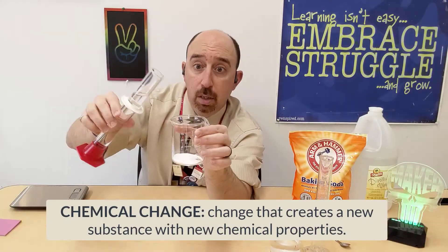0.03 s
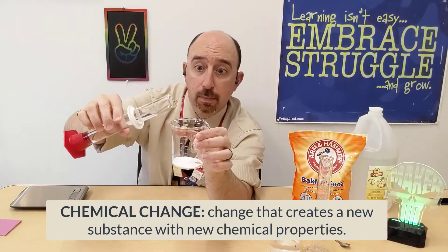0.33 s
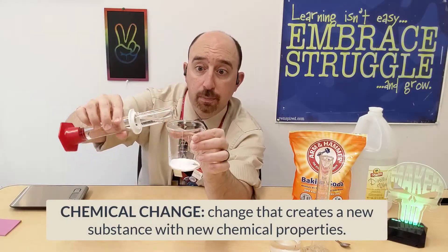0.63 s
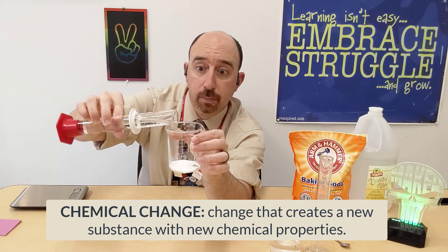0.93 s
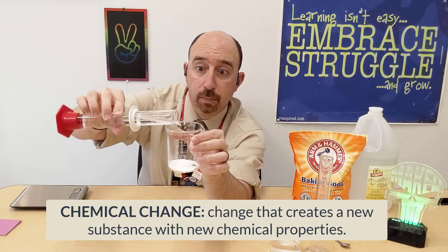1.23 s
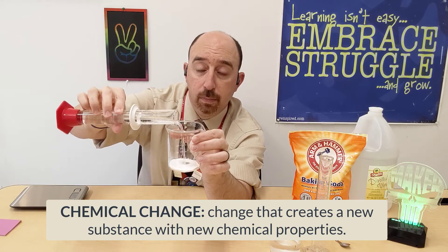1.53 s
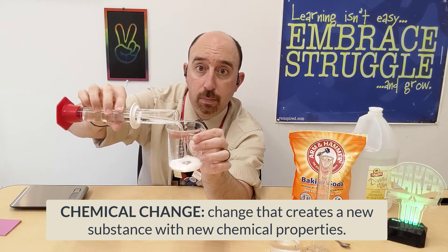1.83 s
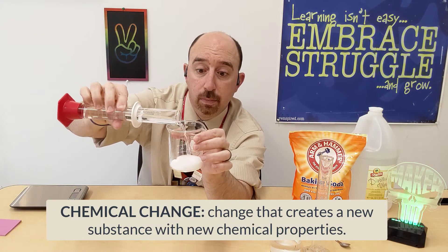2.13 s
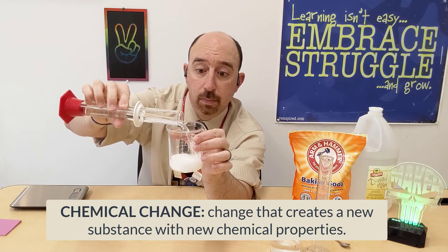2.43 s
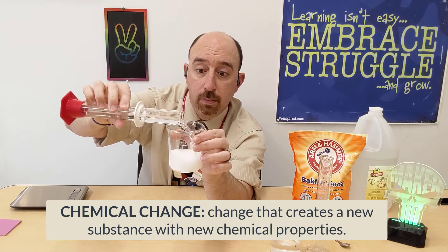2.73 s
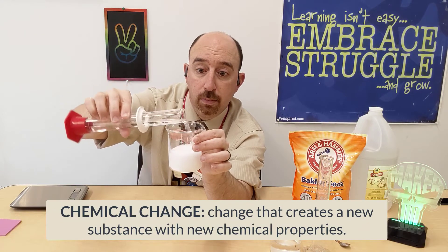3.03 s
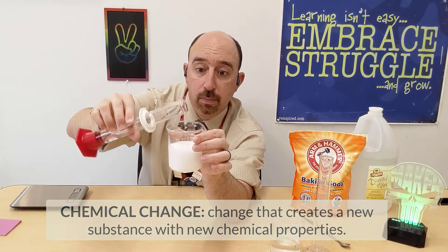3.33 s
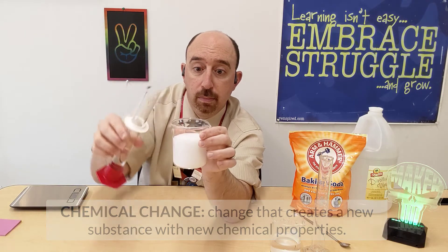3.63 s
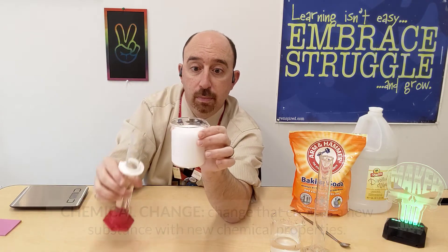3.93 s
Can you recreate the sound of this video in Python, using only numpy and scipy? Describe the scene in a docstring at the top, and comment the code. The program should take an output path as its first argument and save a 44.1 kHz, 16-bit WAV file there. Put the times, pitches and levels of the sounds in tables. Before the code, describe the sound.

A soft fizz in a glass beaker builds over a small room's steady low ventilation rumble. At 1 second a pouring cylinder clinks sharply on the rim, slightly left. Three faint drops ping around 2 seconds as the fine hiss begins, growing fuller and foamier from 3 seconds to the end. Light glassy ticks fall between 2.6 and 3.4 seconds, the loudest at 3.1.

```python
"""Vinegar on baking soda

A small room, low ventilation rumble, a stereo microphone with a hand-held glass beaker slightly left.
The pouring cylinder clinks on the rim, a few drops ping, and bursting bubbles make a fine fizz that
deepens as the foam climbs. The cylinder ticks lightly against the beaker before it is lifted away."""
import sys
import numpy as np
from scipy import signal
from scipy.fft import rfft, irfft, next_fast_len
from scipy.io import wavfile

SR = 44100
rng = np.random.default_rng(int(sys.argv[2]) if len(sys.argv) > 2 else 0)


def put_to_file(sound):
    """Save the sound as 16-bit audio at rate SR, in the file named by the first command-line argument."""
    columns = np.atleast_2d(sound).T  # one column per channel
    safe = np.clip(columns, -1, 1)
    whole_steps = np.round(safe * 32767)
    wavfile.write(sys.argv[1], SR, whole_steps.astype(np.int16))


N = 176400

# room tone, spectra of the air and of the deep rumble: f/Hz, relative level/dB
AIR_COLOUR = [(120, -28), (250, -1), (400, -5), (680, -12.5), (1030, -15), (1280, -26), (1570, -24),
              (2050, -30.5), (2800, -34.5), (3300, -31.5), (4100, -37.5), (4750, -40.5), (5400, -39.5),
              (6600, -43.5), (8800, -44.5), (11000, -45.5), (12200, -49.5), (12700, -49), (15500, -53)]
RUMBLE_COLOUR = [(4, -14), (10, -0.5), (30, 3.5), (45, 0.5), (75, -8.5), (110, -9.5), (200, -13),
                 (260, -16.5), (330, -30), (600, -120)]
# steady room rumble, with low handling bumps at the clink and the loudest tick: t/s, level/dB
RUMBLE_AND_BUMPS = [(0, -29.5), (.85, -29.5), (1.05, -28), (1.4, -29.5), (2.88, -29), (3.04, -23),
                    (3.2, -27.5), (4, -30)]
# room modes driven by the ventilation: f/Hz, half-width/Hz, level/dB
ROOM_MODES = [(22.44, 1.24, -25.5), (55.35, 1.73, -33), (126.6, 3.1, -37), (157.55, 5.3, -36.5),
              (196.95, 1.6, -44.5), (211, 28, -45.5)]
# steady fan tones: f/Hz, level/dB
FAN_TONES = [(154.7, -39.5), (239.7, -64)]
# reverberation of the room: f/Hz, t60/s
ROOM_DECAY = [(200, 0.91), (900, 0.37), (2000, 0.32), (3500, 0.37), (6000, 0.28), (9000, 0.22),
              (15000, 0.15)]
# hollow colour of room noise and fizz at the microphone: f/Hz, width/Hz, boost/dB
MIC_HOLLOWS = [(4160, 210, 3.5), (5770, 320, 6.5), (7560, 370, 4), (9640, 300, 4), (11800, 280, 6)]
# likeness of left and right, for room noise and for fizz: f/Hz, correlation
AIR_LIKENESS = [(30, 1), (120, 0.98), (200, 0.94), (300, 0.66), (640, 0.11), (1400, 0.23), (3100, 0.017)]
FIZZ_LIKENESS = [(900, 0.48), (2400, 0.48), (6000, 0.69), (15000, 0.27)]

# cylinder on the rim, a graze and then the blow: t/s, level/dB
RIM_CONTACTS = [(1.012, -29.5), (1.0141, -16.5)]
# ring of the beaker: f/Hz, relative level/dB, t60/s
BEAKER_MODES = [(850.6, -6.5, 0.11), (892, 0.5, 0.022), (1290, -12.5, 0.037), (1565, -25.5, 0.25),
                (1884, -27.5, 0.47), (3450, -25, 0.3), (3620, -5, 0.02), (3610, -15, 0.081),
                (4500, -16, .012), (5346, -32, 0.37), (5420, -27, 0.29), (5610, 0, 0.014),
                (5676, -8, 0.032), (6850, -5, 0.015), (8350, -18, 0.025), (10000, -16.5, 0.034),
                (14400, -16, .016)]
# spectrum of the clink's crack: f/Hz, relative level/dB
CLINK_COLOUR = [(300, -10), (850, 0.5), (1500, -1.5), (2200, 5), (2700, -4), (3500, 1), (4500, -10.5),
                (5600, -2), (7000, -1.5), (11500, -19), (15000, -9)]
# the clink's echo off a nearby wall: delay/s, relative level/dB
CLINK_ECHO = [(.0131, -14)]
# drops landing in the beaker: t/s, f/Hz, level/dB
DROP_PINGS = [(1.7294, 5900, -55), (1.8677, 5700, -50.5), (2.1151, 4260, -54)]

# rise of the fine fizz and of the coarser foam: t/s, level/dB
FIZZ_RISE = [(1.75, -77), (1.97, -68), (2.12, -60), (2.6, -59), (3.05, -57.5), (3.5, -56.5), (4, -56.5)]
FOAM_RISE = [(2.1, -76), (2.7, -70), (3.1, -59.5), (3.45, -55.5), (3.8, -53), (4, -53)]
# their spectra: f/Hz, relative level/dB
FIZZ_SPECTRUM = [(500, -38), (2000, -5), (4500, 2), (6000, 4), (8000, 4), (10000, 5.5), (11000, 0.5),
                 (13000, 4.5), (14200, 3), (15500, -23)]
FOAM_SPECTRUM = [(200, -25), (600, 1), (1200, -2), (1900, 0), (2600, -5), (3300, 0.5), (3900, 0),
                 (4350, -8.5), (5600, -7), (7000, -29), (10000, -28), (15000, -9.5)]
# resonance of the air above the foam: t/s, f/Hz, level/dB
CAVITY_RISE = [(2.5, 3140, -76), (3.05, 3370, -65.5), (3.5, 3600, -66), (3.85, 3700, -61), (4, 3820, -63)]

# light touches of the cylinder: t/s, level/dB, relative ping level/dB, body f/Hz, relative body level/dB
TOUCHES = [(2.5848, -47, 2, 1330, 2), (2.6973, -33.5, -2.5, 1470, -4), (2.8529, -39.5, -7, 1280, 5),
           (3.101, -23, -10.5, 1150, -5), (3.3994, -50, -20, 1300, 7)]
# their damped ring: f/Hz, relative level/dB, t60/s
TICK_MODES = [(617, -2, 0.016), (986, 3, 0.01), (1594, -7.5, 0.016), (2025, 3, 0.011),
              (2335, -19.5, 0.0056), (3570, -10, 0.013), (4870, -3, 0.0091), (5500, -3.5, 0.0077),
              (8330, -9.5, 0.0096), (9200, -9, 0.008)]
# spectrum of a tick's crack: f/Hz, relative level/dB
TICK_COLOUR = [(300, 4), (1100, 3.5), (2200, -8), (2800, -8.5), (4600, -4.5), (7000, -10.5), (9000, -32),
               (10700, -13), (13000, -12), (15500, -18)]
# a tick's echo off a nearby wall: delay/s, relative level/dB
TICK_ECHO = [(.0195, -10.5)]


def amp(db):
    """Decibels to gain."""
    return 10 ** (np.asarray(db) / 20)


def unit(x):
    """Scale to rms 1."""
    return x / np.sqrt(np.mean(x ** 2) + 1e-20)


def along(points, hz):
    """Interpolate (f/Hz, value) points on a log frequency axis."""
    f, values = np.transpose(points)
    return np.interp(np.log(hz + 1), np.log(f + 1), values)


def spectrum(points):
    """Gain as a function of frequency, from (f/Hz, level/dB) points."""
    return lambda hz: amp(along(points, hz))


def fader(points):
    """Gain per sample from (t/s, level/dB) points, silent before the first."""
    times, db = np.transpose(points)
    return amp(np.interp(np.arange(N) / SR, times, db, left=-120))


def filtered(x, response):
    """Filter x by a gain that is a function of frequency."""
    n = x.shape[-1]
    padded = next_fast_len(n + 8192)
    return irfft(rfft(x, padded) * response(np.fft.rfftfreq(padded, 1 / SR)), padded)[..., :n]


def pan(left_db):
    """Channel gains for a source that is left_db louder on the left."""
    return np.sqrt(amp([[left_db], [-left_db]]))


def add(out, start_s, x):
    """Mix x into out at start_s."""
    i = round(start_s * SR)
    out[:, i:i + x.shape[-1]] += x[..., :N - i]


def diffuse(pair, colour, likeness):
    """Two unrelated signals, coloured and blended into a stereo field at the microphone, rms 1."""
    def response(hz):
        angle = np.arccos(np.clip(along(likeness, hz), -1, 0.998)) / 2
        hollow_db = sum(db * np.exp(-0.5 * ((hz - f) / width) ** 2) for f, width, db in MIC_HOLLOWS)
        return colour(hz) * amp(hollow_db) * np.array([np.cos(angle), np.sin(angle)])
    mid, side = filtered(pair, response)
    return unit(np.array([mid + side, mid - side]))


def room_tone_and_handling():
    """Steady ventilation air, rumble, room modes and fan tones, with two low handling bumps."""
    def noise(colour):
        return diffuse(rng.standard_normal((2, N)), colour, AIR_LIKENESS)
    t = np.arange(N) / SR
    drone = sum(amp(db) * noise(lambda hz: 1 / (1 + ((hz - f) / width) ** 2))
                for f, width, db in ROOM_MODES)
    hum = sum(amp(db) * np.sqrt(2) * np.sin(2 * np.pi * (hz * t + rng.random())) for hz, db in FAN_TONES)
    air = amp(-42.5) * noise(spectrum(AIR_COLOUR))
    rumble = fader(RUMBLE_AND_BUMPS) * noise(spectrum(RUMBLE_COLOUR))
    return air + rumble + drone + hum


def in_room(x, wet_db, echoes=()):
    """A short sound reaches the microphone directly, off the walls and as a diffuse tail."""
    noise = rng.standard_normal((2, SR // 2)) + 0.43 * rng.standard_normal(SR // 2)
    hz, t, bands = signal.stft(noise, SR, nperseg=256)
    decay = amp(-60 * t / along(ROOM_DECAY, hz)[:, None])
    onset = 1 - np.exp(-t / 0.001)
    tail = signal.istft(bands * decay * onset, SR, nperseg=256)[1]
    response = amp(wet_db) * tail / np.linalg.norm(tail[0])
    response[:, 0] += 1  # direct path
    for delay_s, db in echoes:
        response[:, round(delay_s * SR)] += amp(db)
    return signal.fftconvolve(x, response, axes=1)


def strike(modes, crack_colour, crack_db, crack_t60_s, blur_hz=14):
    """One contact on glass: a brief crack and slightly unsteady modes, each channel in its own phase."""
    t = np.arange(SR // 3) / SR
    ring = np.zeros((2, len(t)))
    for hz, db, t60 in modes:
        phase = 2 * np.pi * (hz * t + rng.random())
        drift = np.cumsum(rng.standard_normal(len(t))) * np.sqrt(2 * np.pi * blur_hz / SR)
        mic_phase = rng.normal(0, 0.62, (2, 1))
        ring += amp(db - 60 * t / t60) * np.sin(phase + drift + mic_phase)
    noise = rng.standard_normal(len(t)) + 1.08 * rng.standard_normal((2, len(t)))
    crack = amp(crack_db - 60 * t / crack_t60_s) * unit(filtered(noise, spectrum(crack_colour)))
    attack = 1 - np.exp(-t / 0.00033)
    return (ring + crack) * attack


def clink(shudder_hz=23, shudder_db=-12.5, shudder_t60_s=0.39):
    """Left of centre, the cylinder lands on the rim and rings the beaker, over a deep shudder."""
    out, t = np.zeros((2, N)), np.arange(SR) / SR
    for start_s, db in RIM_CONTACTS:
        contact = strike(BEAKER_MODES, CLINK_COLOUR, crack_db=-1, crack_t60_s=0.021)
        add(out, start_s, amp(db) * in_room(contact, wet_db=-3.5, echoes=CLINK_ECHO) * pan(left_db=3))
    shudder = amp(shudder_db - 60 * t / shudder_t60_s) * np.sin(2 * np.pi * shudder_hz * t)
    add(out, RIM_CONTACTS[-1][0], shudder)
    return out


def drops(t60_s=0.022):
    """The first drops land with tiny high pings, close-sounding, with little room on them."""
    out, t = np.zeros((2, N)), np.arange(SR // 8) / SR
    for start_s, hz, db in DROP_PINGS:
        drift = 0.08 * np.cumsum(rng.standard_normal(len(t)))
        ping = amp(db - 60 * t / t60_s) * np.sin(2 * np.pi * hz * t + drift)
        add(out, start_s, in_room(ping * pan(left_db=2.5), wet_db=-13))
    return out


def bubbles(colour, per_s, spread_db):
    """A dense rain of bursting bubbles, each an impulse of random size, rms 1."""
    bursts = rng.random((2, N)) < per_s / SR
    sizes = rng.standard_normal((2, N))
    unevenness = amp(spread_db * np.clip(rng.standard_normal((2, N)), -2, 2))
    return diffuse(bursts * sizes * unevenness, colour, FIZZ_LIKENESS)


def fizz():
    """In the beaker fine bubbles hiss first; coarser ones join as the foam climbs."""
    fine = fader(FIZZ_RISE) * bubbles(spectrum(FIZZ_SPECTRUM), per_s=15000, spread_db=3)
    coarse = fader(FOAM_RISE) * bubbles(spectrum(FOAM_SPECTRUM), per_s=5000, spread_db=2)
    return (fine + coarse) * pan(left_db=2.5)


def cavity(width_hz=230):
    """Bursting foam rings the air space in the beaker, higher as the space shrinks."""
    times, centre_hz, db = np.transpose(CAVITY_RISE)
    bursts = bubbles(np.ones_like, per_s=3100, spread_db=0)
    hz, t, bands = signal.stft(bursts, SR, nperseg=512)
    resonance = np.exp(-0.5 * ((hz[:, None] - np.interp(t, times, centre_hz)) / width_hz) ** 2)
    ring = signal.istft(bands * resonance, SR, nperseg=512)[1][:, :N]
    return fader(np.transpose([times, db])) * unit(ring) * pan(left_db=2.5)


def ticks(ping_hz=4720, ping_t60_s=0.017, body_t60_s=0.02):
    """The cylinder touches the beaker: a damped ring with a high ping and a dull body."""
    out = np.zeros((2, N))
    for start_s, db, ping_db, body_hz, body_db in TOUCHES:
        modes = list(TICK_MODES) + [(ping_hz, ping_db, ping_t60_s), (body_hz, body_db, body_t60_s)]
        contact = strike(modes, TICK_COLOUR, crack_db=0.5, crack_t60_s=0.014)
        add(out, start_s, amp(db) * in_room(contact, wet_db=-2, echoes=TICK_ECHO))
    return out * pan(left_db=2.5)


def scene():
    """Room tone and the beaker, as heard from the microphone position."""
    return room_tone_and_handling() + clink() + drops() + fizz() + cavity() + ticks()


def record(dry):
    """The recorder falls off steeply at its band limit."""
    top_hz = 15650
    return filtered(dry, lambda hz: 1 / np.sqrt(1 + (hz / top_hz) ** 160))


dry = scene()
out = record(dry)
put_to_file(out)
```